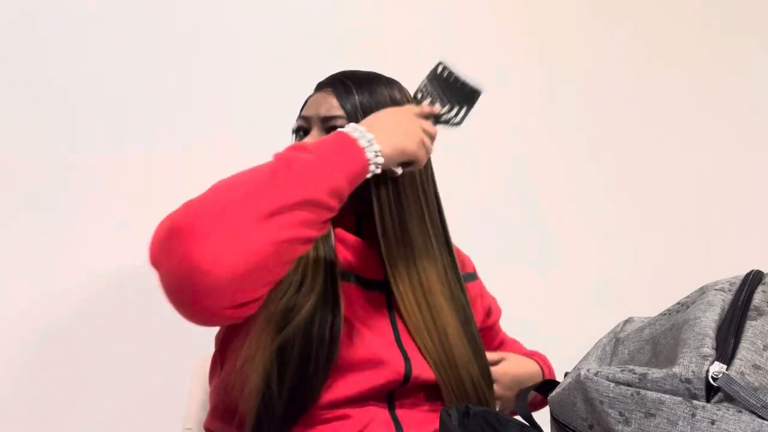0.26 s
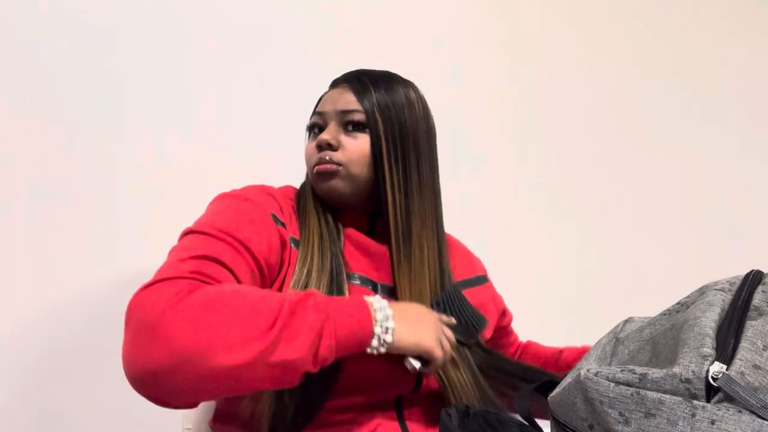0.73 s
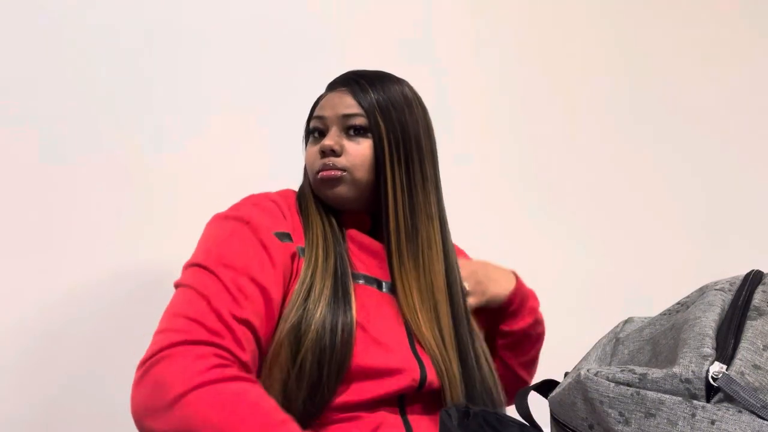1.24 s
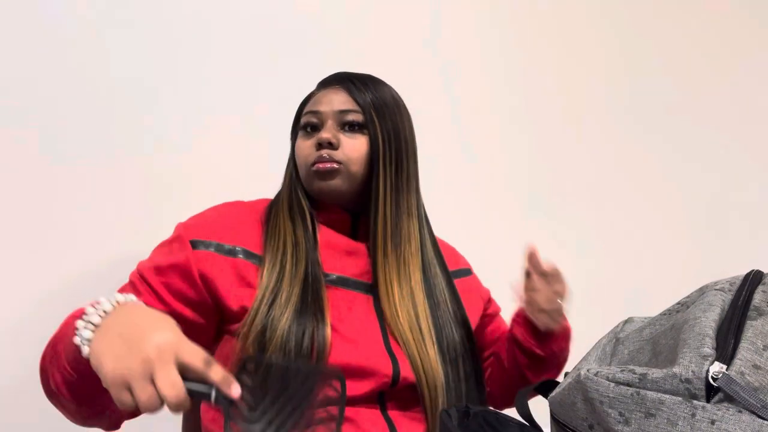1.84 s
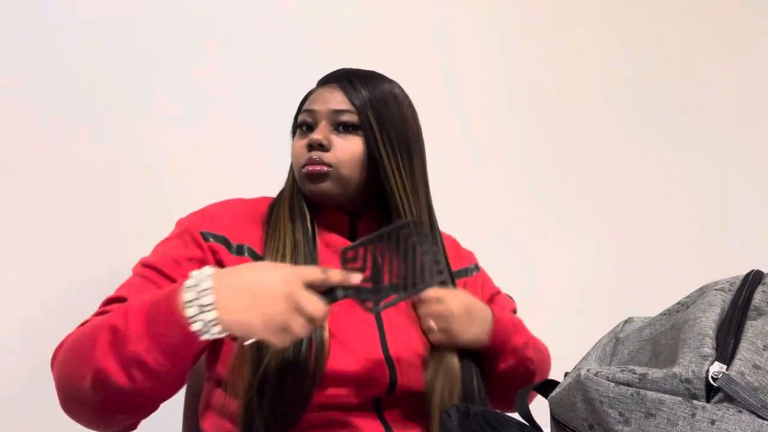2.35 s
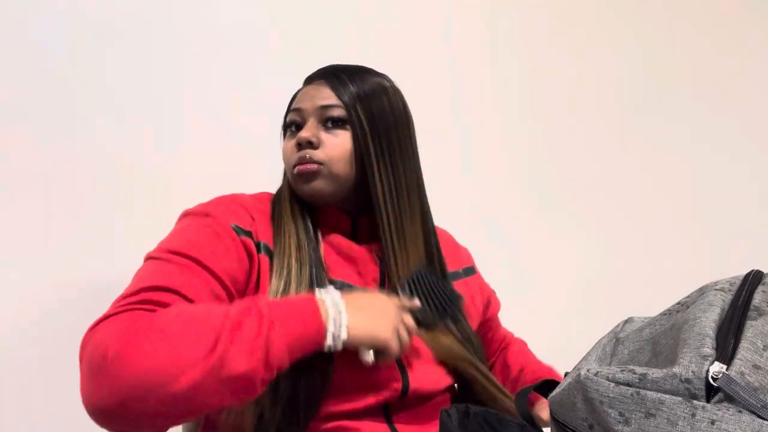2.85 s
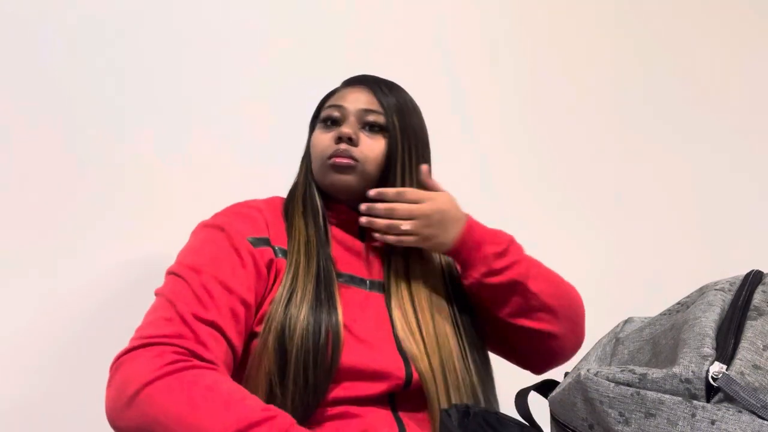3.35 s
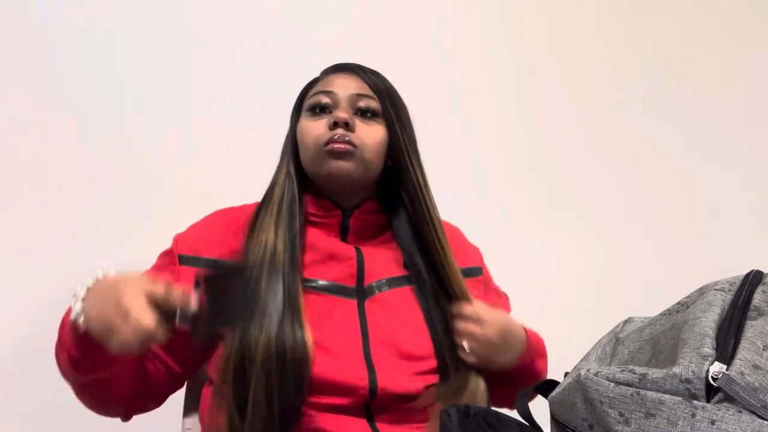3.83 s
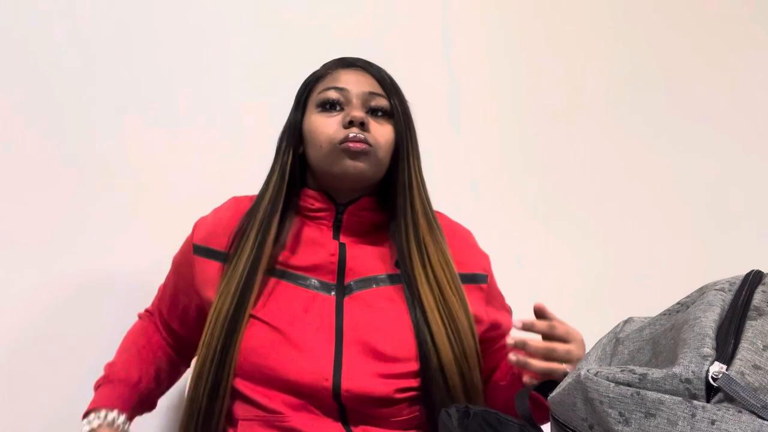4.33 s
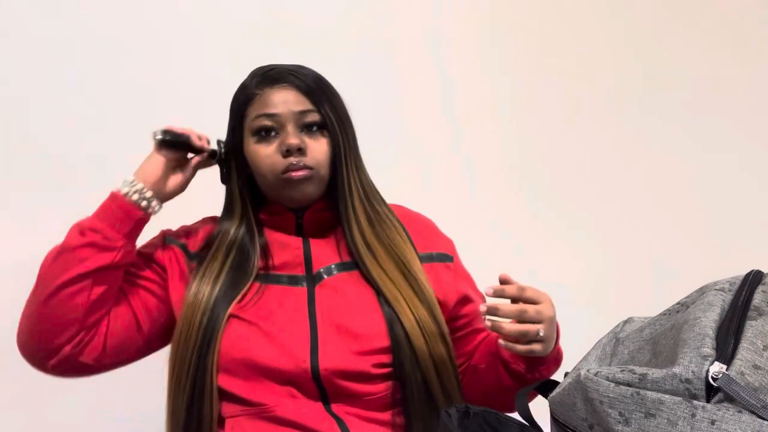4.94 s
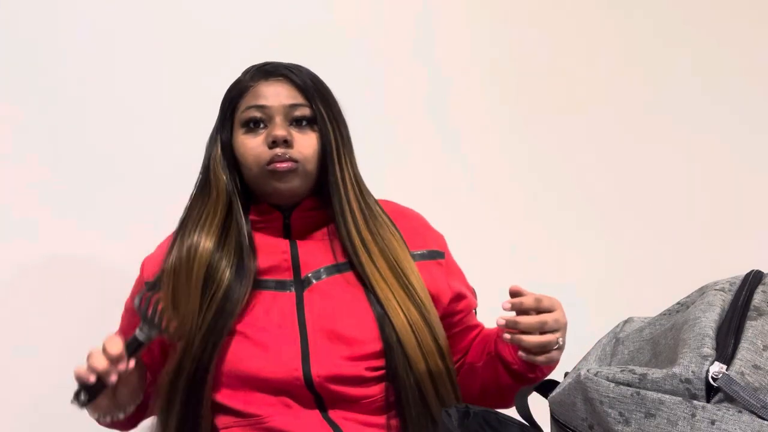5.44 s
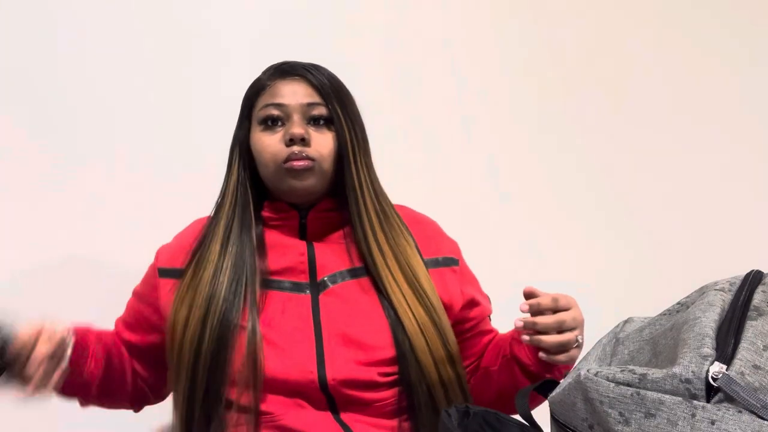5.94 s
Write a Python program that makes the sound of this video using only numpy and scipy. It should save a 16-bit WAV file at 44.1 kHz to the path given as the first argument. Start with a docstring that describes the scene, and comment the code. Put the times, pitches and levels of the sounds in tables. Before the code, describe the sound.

A low, steady 120 Hz-like hum with fluttering duct rumble and soft air rush runs throughout. Near 0.3 s a sleeve rustles and a tick sounds; a crisp, gritty hair stroke hisses strongest at 0.4-0.5 s, continues softly to 1.1 s, with clicks at 0.7 and 1.0. Faint hand brushes follow at 1.3. At 1.83-1.88 a hollow plastic knock rattles, the brush being picked up, then a light touch at 2.2. A softer stroke lands at 2.7 and hisses to 3.2, ending in small ticks and dull rubbing. After quiet stirring, a rough bright scrape bursts at 4.12 amid a short, tangled stroke, 4.0-4.55, with pings and a strong swish at 4.4. Cloth rustles faintly at 4.8. A thin, high stroke runs 5.0-5.75 with a sharp click at 5.17. Tiny ticks finish, the sharpest at 6.03. Close microphones, small room, extreme treble missing.

```python
"""A plastic vent brush is drawn through long hair: gritty noise hisses in strokes over a duller rub.
A sleeve rustles, made of coarser noise, and small hard things tick as very short puffs of noise.
Freed bristles ring as damped tones; a few scuffs of brush or hand ring resonances in a small room.
An air handler hums with nearly steady tones, a low duct rumble that flutters and a rush of noise.
A phone with two close microphones listens and cuts off the highest treble."""
import sys
import numpy as np
from scipy import signal
from scipy.fft import rfft, irfft, next_fast_len
from scipy.io import wavfile
from scipy.ndimage import uniform_filter1d, map_coordinates

SR = 44100
rng = np.random.default_rng(int(sys.argv[2]) if len(sys.argv) > 2 else 0)


def int16_out(signal):
    """Quantize to a 16-bit WAV file."""
    q = np.round(np.clip(np.atleast_2d(signal).T, -1, 1) * 32767)
    wavfile.write(sys.argv[1], SR, q.astype(np.int16))


N = 272493  # length in samples


def amp(db):
    """Turns decibels into a gain."""
    return 10 ** (np.asarray(db) / 20)


def unit(x):
    """Scales a signal to an rms of 1."""
    return x / np.sqrt(np.mean(np.abs(x) ** 2) + 1e-20)


def along(points, hz):
    """Reads (Hz, value) points at any pitch, in straight lines on a log pitch axis."""
    point_hz, values = np.transpose(points)
    return np.interp(np.log(hz + 1), np.log(point_hz + 1), values)


def curves(rows):
    """One value per sample for each column after the time."""
    s, *columns = np.transpose(rows)
    return [np.interp(np.arange(N) / SR, s, column) for column in columns]


def wobble(rate):
    """A smooth random curve through this many random points a second."""
    points = rng.standard_normal(int(N * rate / SR) + 4)
    return map_coordinates(points, [np.arange(N) * rate / SR])


def filtered(x, response):
    """Filters x by a (possibly complex) response to each frequency."""
    m = next_fast_len(N + SR // 2)  # spare room so that ringing does not wrap round
    return irfft(rfft(x, m) * response(np.fft.rfftfreq(m, 1 / SR)), m)[..., :N]


def modes(table):
    """Response of a body whose (Hz, width Hz, dB) resonances ring only after they are struck."""
    def response(f):
        total = 0
        for k, (center, width, db) in enumerate(table):
            resonance = 1j * f * width / (center * center - f * f + 1j * f * width)
            total = total + (-1) ** k * amp(db) * resonance  # neighbours get opposite signs
        return total
    return response


def bumps(rows):
    """Sum of peaks (s, dB, rise s, fall s); rise and fall are the times for 20 dB."""
    t = np.arange(N) / SR
    return sum(amp(db - 20 * np.maximum((s - t) / rise, (t - s) / fall)) for s, db, rise, fall in rows)


def swells(rows):
    """Peaks (s, dB, s for 20 dB) that rise as fast as they fall."""
    return bumps((s, db, half, half) for s, db, half in rows)


def grit(depth_db, smooth=12):
    """Two channels of noise whose size jumps from one tiny slip to the next, alike in both."""
    slips = uniform_filter1d(rng.standard_normal(N), size=smooth)
    return rng.standard_normal((2, N)) * amp(depth_db * unit(slips))


def spread(pair, spectrum, alike):
    """Colours two noises and mixes them to the given left-right likeness, rms 1."""
    def weights(hz):
        turn = np.arccos(np.clip(along(alike, hz), -1, 1)) / 2
        return amp(along(spectrum, hz)) * [np.cos(turn), np.sin(turn)]

    mid, side = filtered(pair, weights)
    return unit(np.array([mid + side, mid - side]))


def air_handler():
    """Hum lines whose pitch and level waver, a low fluttering duct rumble and the rush of air."""
    # Mains hum. Each row: pitch in Hz, level in dB relative to the changing hum level.
    hum_lines = [(120, -1), (600, -37), (720, -41)]
    # The hum wavers. Each row: time in seconds, level in dB.
    hum_level = [(0.06, -36.5), (0.47, -33.5), (0.67, -36.5), (0.82, -33.5), (1.79, -36), (1.87, -31.5),
                 (2.03, -38.5), (2.09, -33.5), (2.2, -31.5), (2.25, -34.5), (2.57, -34), (2.71, -36.5),
                 (2.74, -35), (4.62, -35), (5.11, -34), (5.25, -37.5), (5.57, -35.5), (6.15, -36.5)]
    # The duct rumble: middle pitch in Hz, random phase points a second, size of the phase turn in radians.
    duct_hz, rate, turn = (63.5, 7.8, 1)
    # Level of the low duct rumble, a narrow noise that flutters at random.
    # Each row: time in seconds, level in dB.
    duct_level = [(0.06, -49), (0.58, -66), (0.63, -44), (0.89, -59), (1.14, -45), (1.21, -60), (1.31, -40),
                  (1.43, -60), (1.52, -39.5), (1.65, -49.5), (1.72, -43.5), (2.06, -54), (2.13, -41.5),
                  (2.18, -55), (2.55, -46), (3.27, -50), (3.32, -65.5), (3.5, -41.5), (3.57, -48.5),
                  (3.94, -38), (4.18, -50), (4.22, -45), (4.59, -49), (4.81, -44), (4.91, -49.5),
                  (6.15, -52.5)]
    # Colour of the rush. Each row: frequency in Hz, relative level in dB per Hz.
    air_color = [(20, -26.5), (40, -4), (90, 0), (140, 1), (220, -4), (400, -13), (590, -19.5),
                 (800, -29.5), (1000, -42), (2000, -46.5), (3200, -54), (6500, -57.5), (9500, -58.5),
                 (12800, -60.5), (14400, -55), (15800, -62)]
    # Each row: frequency in Hz, left-right likeness of the rush (1 same, -1 opposite).
    air_alike = [(60, 0.98), (130, 0.86), (290, 0.8), (640, -0.62), (1400, -0.36), (3100, 0.019),
                 (7300, -0.2), (7600, 1), (11600, 0.97), (12000, 0.33), (12800, -0.5), (13300, -0.95),
                 (15000, -.95), (15600, -.5)]
    rush_db = -44

    t = np.arange(N) / SR
    (hum_db,), (duct_db,) = curves(hum_level), curves(duct_level)
    hum = sum(amp(db) * np.sqrt(2) * np.sin(2 * np.pi * hz * t + 0.2 * wobble(0.95))
              for hz, db in hum_lines)
    rumble = np.sin(2 * np.pi * duct_hz * t + turn * wobble(rate))
    rush = spread(rng.standard_normal((2, N)), air_color, air_alike)
    # each part is a little louder on the right
    hum = hum * amp(hum_db + [[-1], [1]])
    duct = unit(rumble) * amp(duct_db + [[-.5], [.5]])
    return hum + duct + amp(rush_db) * rush * amp([[-.6], [.6]])


def strokes():
    """Hiss and rustle levels of all strokes, nearly silent between them."""
    # One list a brush stroke. Each row: time in seconds, treble hiss in dB, duller rustle in dB.
    stroke_rows = [
        [(.345, -80.5, -79.5), (.365, -61.5, -73), (.41, -55, -65), (.46, -53, -64), (.5, -64, -74.5),
         (.56, -66, -79.5), (.725, -58.5, -66.5), (.87, -64.5, -81), (1.0, -68, -90), (1.03, -67.5, -81),
         (1.08, -74.5, -76.5)],
        [(2.7, -62.5, -71), (2.745, -62.5, -75.5), (2.81, -64.5, -77), (2.85, -60, -72.5), (2.96, -66, -79),
         (2.99, -63.5, -79), (3.1, -72, -81.5), (3.145, -70, -78), (3.23, -75, -80.5)],
        [(4.035, -73, -90), (4.05, -68, -71), (4.09, -63, -71), (4.16, -59.5, -57), (4.23, -61.5, -73),
         (4.256, -60.5, -60), (4.33, -76, -72), (4.37, -69, -70.5), (4.4, -53, -62.5), (4.44, -56, -62),
         (4.49, -70, -69), (4.52, -75.5, -75), (4.57, -87.5, -81.5)],
        [(5.01, -84.5, -87), (5.03, -69.5, -83), (5.065, -73.5, -83), (5.16, -63, -80.5), (5.21, -66, -83),
         (5.39, -62.5, -87), (5.52, -58, -79), (5.66, -60, -80), (5.73, -69.5, -85.5)],
    ]
    lift_s = 0.04  # fade-in time of a stroke; the fade-out takes twice as long
    silent = (-120, -120)
    rows = []
    for stroke in stroke_rows:
        rows += [(stroke[0][0] - lift_s, *silent), *stroke, (stroke[-1][0] + 2 * lift_s, *silent)]
    return curves(rows)


def crackle():
    """Strands snap off the bristles: half-millisecond snaps of uneven size, as a gain on noise."""
    snaps_per_s, snap_db, scatter_db = 300, -1, 1.5  # level is relative to the steady hiss
    sizes = amp(snap_db + scatter_db * rng.standard_normal(N))
    snaps = (rng.random(N) < snaps_per_s / SR) * sizes
    return 1 + np.convolve(snaps, np.hanning(24), "same")


def patchy(pair, depth_db):
    """The colour shifts: random gain in patches of time and frequency."""
    z = signal.stft(pair, nperseg=256)[2]
    field = uniform_filter1d(rng.standard_normal(z.shape[1:]), size=6, axis=0)  # across frequency
    field = uniform_filter1d(field, size=12, axis=1)  # across time
    return signal.istft(z * amp(depth_db * unit(field)), nperseg=256)[1][:, :N]


def brushing():
    """Strands slip past the bristles as fine grit; cloth and tangles rub in coarser clumps."""
    # Colours of hair, bristles, sleeve and dull rub. Each row: frequency in Hz, relative dB per Hz.
    hair_color = [(3000, -46.5), (5500, -5.5), (7000, -2), (8800, 0), (10500, -2), (12300, 1), (13500, 1),
                  (15700, 0.5)]
    bristle_color = [(2200, -43.5), (3100, -8), (3800, -6.5), (4300, -5), (4900, -6.5), (6200, -9.5),
                     (9000, -36.5)]
    sleeve_color = [(1200, -50), (1650, -5.5), (2200, -3), (2800, -5.5), (3500, -22), (5500, -32.5)]
    rub_color = [(550, -44.5), (850, 1.5), (1300, -5.5), (1700, -5), (2600, -42)]
    # Each row: frequency in Hz, left-right likeness (1 same, -1 opposite).
    alike = [(1000, 0.5), (3000, 0), (4500, -.4), (7400, -0.2), (7700, 1), (11500, 1), (11900, 0.2),
             (12700, -.4), (13100, -.8), (13300, -1), (15000, -1), (15600, -.6)]
    # A hand slides over the hair. Each row: peak in seconds, level in dB, seconds to fall 20 dB.
    touches = [(1.262, -70, 0.035), (1.342, -67, 0.12), (2.158, -67, 0.046), (2.178, -75, 0.046),
               (3.451, -83, 0.036), (3.531, -79.5, 0.035), (3.89, -80.5, .05), (6.042, -80.5, .04)]
    # Bristles alone. Each row: peak in seconds, level in dB, seconds to rise or fall 20 dB.
    swishes = [(2.25, -82.5, .06), (4.088, -58.5, 0.047), (4.26, -67, 0.015)]
    # The sleeve moves. Each row: peak in seconds, level in dB, seconds to rise or fall 20 dB.
    rustles = [(.22, -85.5, 0.053), (.33, -73.5, 0.093), (1.37, -80.5, 0.17), (1.53, -83.5, .15),
               (2.61, -80.5, 0.17), (3.65, -79, 0.09), (3.86, -85, 0.063), (4.68, -92, .08),
               (4.8, -78.5, 0.18), (5.035, -82, 0.049)]
    # Dull drags in the tangles. Each row: peak in seconds, level in dB, seconds to rise or fall 20 dB.
    rubs = [(1.0, -71.5, 0.17), (1.37, -85, 0.13), (2.99, -72, .05), (3.113, -66, .03), (3.19, -74, 0.087),
            (4.17, -62, .08), (4.256, -68, 0.032), (4.346, -63.5, 0.072), (4.43, -64.5, 0.02),
            (4.8, -79.5, .2), (5.16, -77.5, .08)]
    # Faint stirring under the strokes: levels of hair, bristles, sleeve and rub in dB.
    rest = (-99, -100, -93, -92.5)

    hiss_db, rustle_db = strokes()
    swish_db = 0.33 * hiss_db + 0.67 * rustle_db + 0.5  # lies between hiss and rustle
    touch = bumps((s, db, 0.015, fade) for s, db, fade in touches)
    stir = [amp(db + 2.4 * wobble(24)) for db in rest]
    tug = wobble(60)  # tangles catch and let go

    hair_level = (amp(hiss_db) + touch + stir[0]) * amp(0.72 * tug)
    hair = hair_level * spread(patchy(crackle() * grit(2.0), depth_db=0.4), hair_color, alike)

    swish_level = amp(swish_db) + amp(-1.5) * touch + swells(swishes) + stir[1]
    swish_level = swish_level * amp(1.1 * tug + 0.87 * wobble(30))
    swish_noise = patchy(crackle() * grit(2.0, smooth=25), depth_db=2.0)
    swish = swish_level * spread(swish_noise, bristle_color, alike)

    cloth_level = amp(rustle_db) + swells(rustles) + stir[2]
    cloth_level = cloth_level * amp(1.0 * tug + 0.4 * wobble(30))
    cloth = cloth_level * spread(patchy(grit(0.59, smooth=40), depth_db=2.5), sleeve_color, alike)

    rub_level = amp(rustle_db - 4.5) + swells(rubs) + stir[3]  # follows the rustle
    rub_level = rub_level * amp(1.6 * tug + 1.2 * wobble(30))
    rub = rub_level * spread(grit(1.6, smooth=60), rub_color, alike)
    return hair + swish * amp([[-.8], [.8]]) + cloth + rub


def airy_swishes():
    """Narrow airy swishes of bristles and moving sleeve: noise in a narrow band under slow swells."""
    # Each row: peak in seconds, level in dB, seconds to rise or fall 20 dB, pitch in Hz,
    # width in Hz of a resonance that is applied twice.
    swish_rows = [(.26, -85, 0.13, 4200, 800), (.22, -83.5, .08, 2100, 500), (.3, -73.5, 0.096, 2250, 600),
                  (0.45, -62, 0.064, 2710, 500), (2.64, -81, 0.11, 4200, 800), (2.78, -75, .12, 2200, 698),
                  (2.85, -78, .1, 1800, 600), (3.2, -75.5, .08, 1900, 900), (4.074, -60, 0.024, 4060, 806),
                  (4.2, -72, .06, 4100, 500), (4.43, -64, .06, 3500, 1200), (4.679, -81, .06, 1895, 602),
                  (4.8, -77, 0.11, 2000, 602), (4.738, -76.5, 0.1, 4260, 700),
                  (4.815, -80.5, 0.12, 4180, 588), (4.895, -87, .12, 4260, 600),
                  (5.026, -78, 0.069, 2180, 500), (5.154, -78, .15, 2440, 500)]
    air = grit(1.5) * amp(1.5 * wobble(22))
    total = 0
    for s, db, half, hz, width_hz in swish_rows:
        band = filtered(air, lambda f: modes([(hz, width_hz, 0)])(f) ** 2)
        total = total + swells([(s, db, half)]) * unit(band)
    return total


def pings():
    """A bristle or the brush's plastic springs free and rings briefly as one damped tone."""
    # Each row: start in seconds, level in dB before the fades, pitch in Hz, seconds to fall 60 dB.
    ping_rows = [(.301, -72, 8500, .008), (1.846, -45, 1920, 0.047), (1.848, -57.5, 4680, .03),
                 (1.85, -53, 5750, .03), (1.861, -43, 1920, 0.043), (1.862, -53, 5500, .03),
                 (1.867, -43.5, 1980, 0.027), (2.702, -51, 2250, .06), (2.843, -60, 4120, .02),
                 (3.109, -55, 1380, .03), (3.124, -62, 1150, .03), (3.221, -62, 2000, .03),
                 (4.246, -48.5, 1990, .06), (4.258, -47, 1370, 0.047), (4.298, -52, 1090, .03),
                 (4.334, -57, 1035, .06), (4.366, -57.5, 1530, .04), (4.389, -56, 1010, .03),
                 (4.401, -50, 1650, .04), (4.431, -57, 5600, .04), (4.446, -56, 1500, 0.041),
                 (5.178, -63, 2760, .04)]
    rise_s = .002  # time constant of the soft start
    t = np.arange(N) / SR
    total = 0
    for s, db, hz, t60 in ping_rows:
        after = np.clip(t - s, 0, 1)
        level = amp(db - 60 * after / t60) * (1 - np.exp(-after / rise_s))
        total = total + level * np.sin(2 * np.pi * hz * after)
    return total


def facing(hz):
    """The treble reaches the two microphone ports with its phase turned in opposite ways."""
    # Each row: frequency in Hz, phase turn in radians on each side.
    ports = [(4500, .15), (5500, .45), (7500, 0.45), (10500, 0.15), (11500, 0.4), (12300, .9), (13400, 1.1),
             (15000, 1.4)]
    return np.exp(1j * np.array([[1], [-1]]) * along(ports, hz))


def ticks():
    """Each tick of small hard things is a very short puff of noise with a dull and a bright part."""
    # Each row: start in seconds, level in dB, dull part in dB, bright part in dB; the parts are
    # relative to the level and are raised and filtered below.
    tick_rows = [(0.365, -43, -14, -13), (0.6933, -43, -18, -11), (0.779, -61, -8, -27.5),
                 (0.794, -58.5, -4, -17.5), (0.852, -59, -16, -9.5), (0.996, -48, -33, -15),
                 (1.0242, -45, -29, -15), (1.0772, -56.5, -30, -19.5), (1.8317, -51, -6, -22),
                 (1.842, -54, -19, -16.5), (3.1094, -63.5, -1, -17), (3.124, -55.5, -1, -16),
                 (3.142, -48.5, -25.5, -13.5), (3.1811, -63, -30, -8), (3.202, -61, -11, -9.5),
                 (3.222, -55.5, -13.5, -28.5), (4.0363, -56, -2, -21.5), (4.044, -51.5, 1, -25.5),
                 (4.252, -52, 4, -20), (4.2612, -51.5, -21, -20), (4.382, -56, 1, -24.5),
                 (4.393, -54.5, -5.5, -22.5), (5.108, -62.5, -30, -12.5), (5.14, -62.5, -25, -12.5),
                 (5.169, -41, -34, -11), (5.181, -59.5, -0.5, -20.5), (5.885, -65, -24, -16),
                 (5.896, -68, -28, -12.5), (6.0021, -56, -22, -12.5), (6.0182, -56.5, -25, -6),
                 (6.0326, -38, -34, -21.5), (6.1432, -56, -15, -10)]
    dull, bright, t = np.zeros(N + SR), np.zeros(N + SR), np.arange(SR // 50) / SR
    fade_db = -60 * t / .007
    for s, db, dull_db, bright_db in tick_rows:
        puff = amp(db + fade_db) * rng.choice([-1, 1], len(t))
        start = round(s * SR)
        dull[start:][:len(t)] += amp(dull_db + 10.5) * puff
        bright[start:][:len(t)] += amp(bright_db + 14.0) * puff
    dull = filtered(dull[:N], lambda f: modes([(2000, 2600, 0)])(f) ** 2)
    bright = filtered(bright[:N], lambda f: modes([(10500, 11000, 0)])(f) ** 2 * facing(f))
    return dull + bright


def scuff(slips, body, pan, aside_db):
    """A quick run of stick-slip grains rings the body that is scuffed."""
    level = bumps((s, db, 0.0035, 0.0071) for s, db in slips)
    ring = modes(body)
    gain = np.sqrt(np.mean(np.abs(ring(np.linspace(1, SR / 2, 4000))) ** 2))  # evens out the bodies
    near, aside = filtered(level * grit(2.9, smooth=45), ring) / gain
    # near surfaces answer differently left and right: (Hz, dB)
    aside_color = [(600, -1.5), (2000, -6), (6000, 1.0), (8500, -11.5)]
    aside = filtered(aside, lambda f: amp(aside_db + along(aside_color, f)))
    both = filtered(near, facing) + aside * [[1], [-1]]
    return filtered(both, lambda f: amp(along(pan, f) / 2 * [[1], [-1]]))  # pan: left minus right dB


def pick_up_scuff():
    """The pick-up: nine slips ring a body with its strongest resonance low down."""
    # Each row: slip in seconds, level in dB.
    slips = [(1.8318, -43.5), (1.837, -51), (1.842, -45), (1.848, -35.5), (1.855, -36.5), (1.864, -35),
             (1.869, -41.5), (1.876, -39.5), (1.884, -52)]
    # Each row: resonance in Hz, width in Hz, relative level in dB.
    body = [(648, 45, 10.5), (995, 56, 1.5), (1203, 110, -2), (1480, 82, -3.5), (1680, 120, -1),
            (1890, 200, 1), (2200, 250, -3), (2530, 230, -5.5), (3460, 300, -11.5), (4120, 200, -16),
            (4500, 350, -13.5), (5240, 300, -16), (5800, 200, -12.5), (8160, 680, -23),
            (12000, 2700, -28.5), (6770, 6000, -34)]
    return scuff(slips, body, pan=[(1000, -0.56)], aside_db=-4.0)


def landing_scuff():
    """The landing: four soft slips ring a body with one narrow resonance and broad treble ones."""
    # Each row: slip in seconds, level in dB.
    slips = [(2.701, -53.5), (2.708, -51.5), (2.716, -55), (2.724, -51.5)]
    # Each row: resonance in Hz, width in Hz, relative level in dB.
    body = [(1450, 230, -15.5), (2220, 140, 1.5), (4500, 1900, -9), (6960, 890, -6), (9100, 1500, -4),
            (12800, 3900, -8.5)]
    return scuff(slips, body, pan=[(1000, -3.5)], aside_db=-11.5)


def scrape_scuff():
    """The scrape: four slips ring a body with many resonances from low to high."""
    # Each row: slip in seconds, level in dB.
    slips = [(4.119, -33.5), (4.127, -29), (4.136, -30), (4.142, -48.5)]
    # Each row: resonance in Hz, width in Hz, relative level in dB.
    body = [(430, 74, -5), (816, 590, -10), (1290, 130, -0.5), (2045, 660, -8.5), (4020, 680, -0.5),
            (5060, 980, -4), (8920, 580, -10), (12700, 2100, -12.5), (15300, 990, -26)]
    # Each row: frequency in Hz, left minus right in dB.
    pan = [(700, 0.5), (2400, .5), (4400, -1.5), (8100, -1.5)]
    return scuff(slips, body, pan=pan, aside_db=-12.5)


def room(x):
    """A diffuse answer: fresh noise follows the sound's power, and each frequency dies at its own speed."""
    # Each row: frequency in Hz, seconds to die away by 60 dB.
    decay = [(300, 0.44), (640, 0.46), (1000, 0.41), (2500, 0.43), (5000, 0.67), (7000, 0.18),
             (12000, 0.13)]
    late = np.pad(x.mean(0), (400, 0))[:N]  # the answer comes 400 samples later
    hz, t, z = signal.stft(late, SR, nperseg=256)
    keep = amp(-120 * t[1] / along(decay, hz))  # share of power left after one frame
    power = np.array([signal.lfilter([1 - k], [1, -k], row) for k, row in zip(keep, np.abs(z) ** 2)])
    diffuse = unit(signal.stft(rng.standard_normal((2, N)), SR, nperseg=256)[2])
    return signal.istft(diffuse * np.sqrt(power), SR, nperseg=256)[1][:, :N]


def scene():
    """Adds all sources; the scuffs, pings and ticks also get an answer from the room."""
    pick_up = pick_up_scuff()
    others = landing_scuff() + scrape_scuff() + pings() + ticks()
    struck = pick_up + amp(-10.5) * room(pick_up) + others + amp(-19.0) * room(others)
    return struck + brushing() + airy_swishes() + air_handler()


def record(dry):
    """The phone keeps nothing above its band limit."""
    top_hz = 15830
    return filtered(dry, lambda hz: hz < top_hz)


dry = scene()
out = record(dry)
int16_out(out)
```